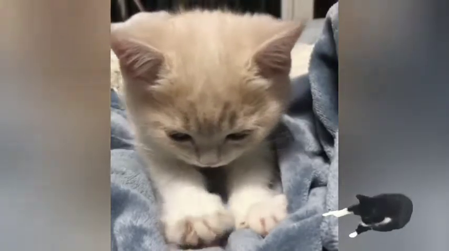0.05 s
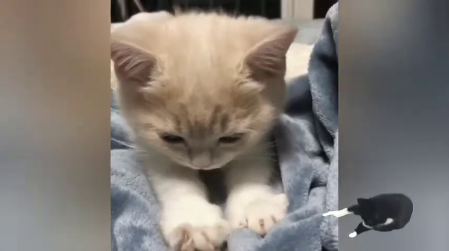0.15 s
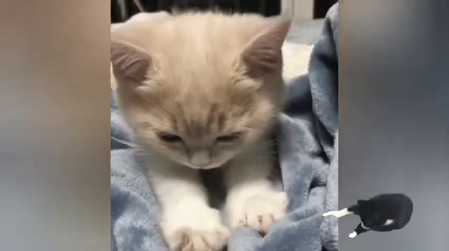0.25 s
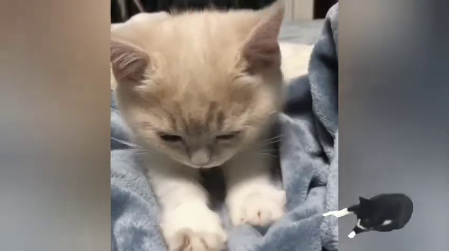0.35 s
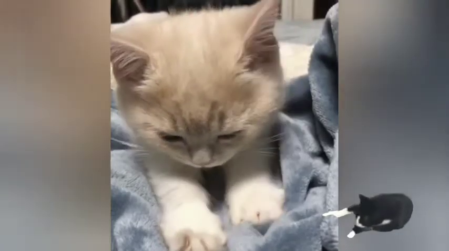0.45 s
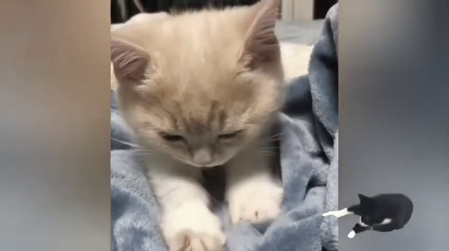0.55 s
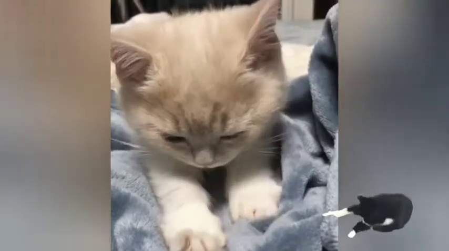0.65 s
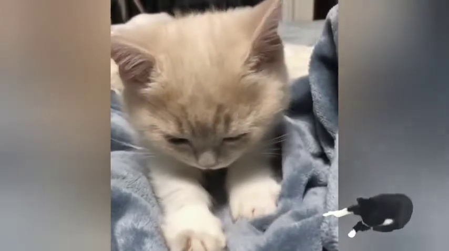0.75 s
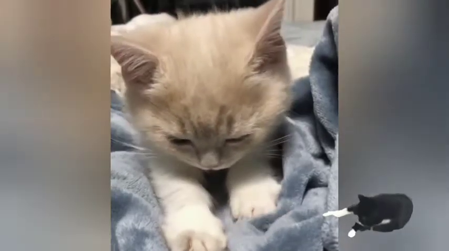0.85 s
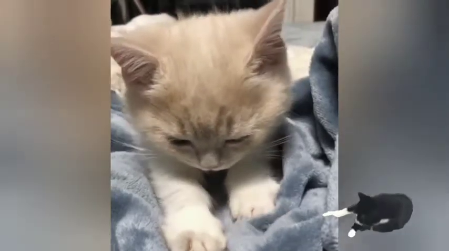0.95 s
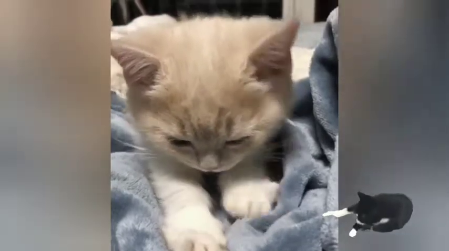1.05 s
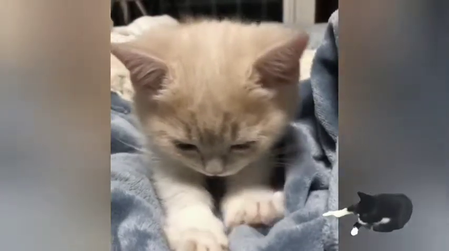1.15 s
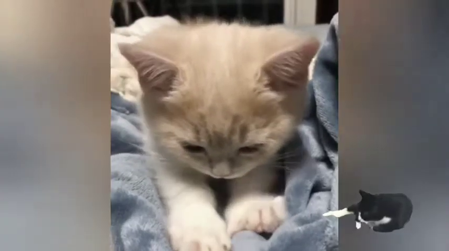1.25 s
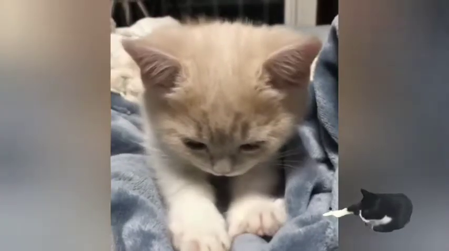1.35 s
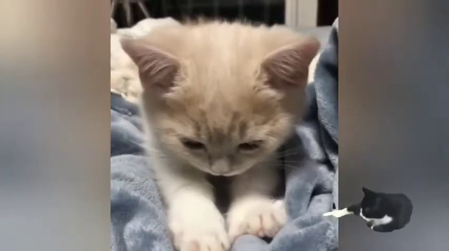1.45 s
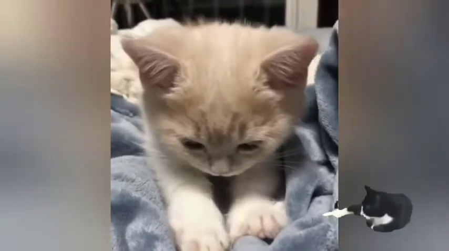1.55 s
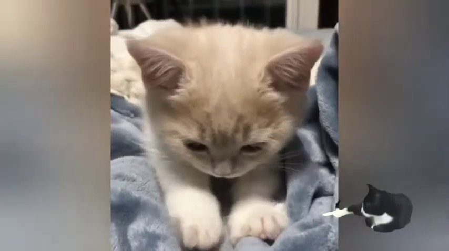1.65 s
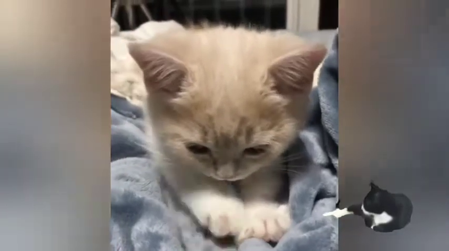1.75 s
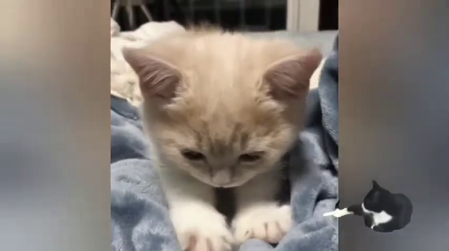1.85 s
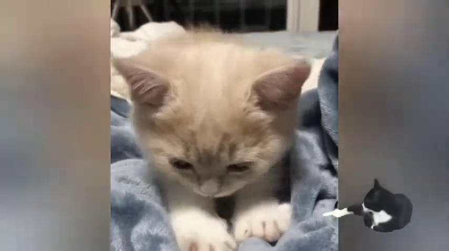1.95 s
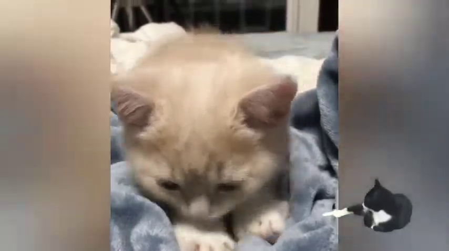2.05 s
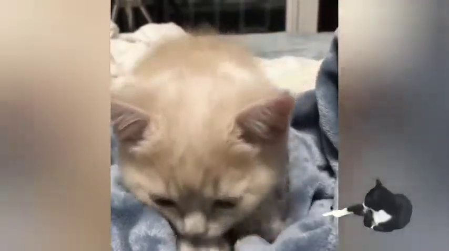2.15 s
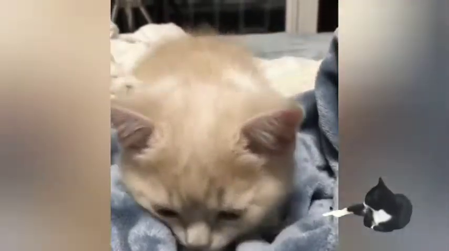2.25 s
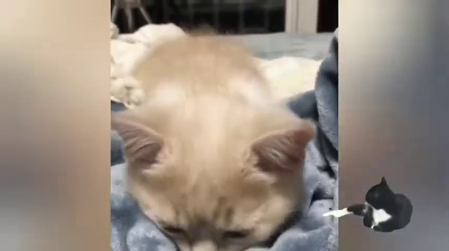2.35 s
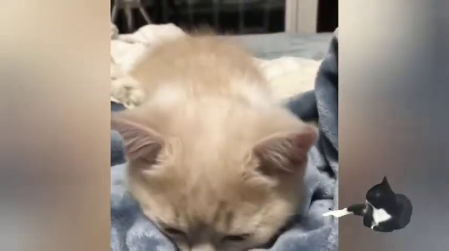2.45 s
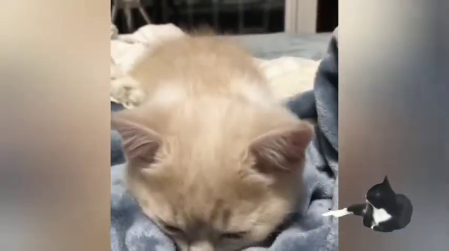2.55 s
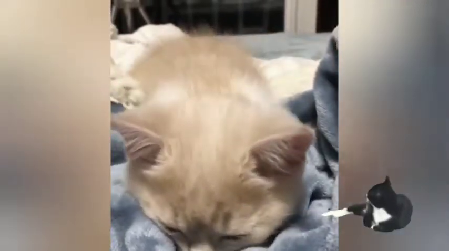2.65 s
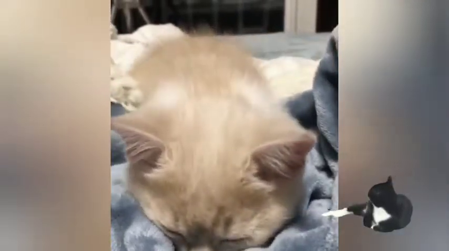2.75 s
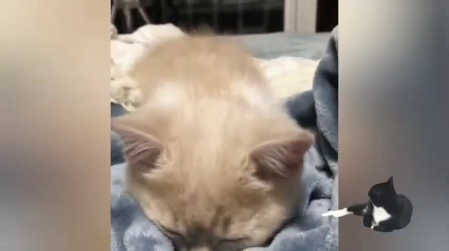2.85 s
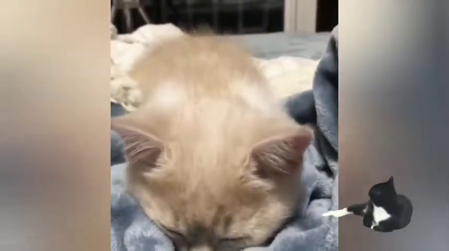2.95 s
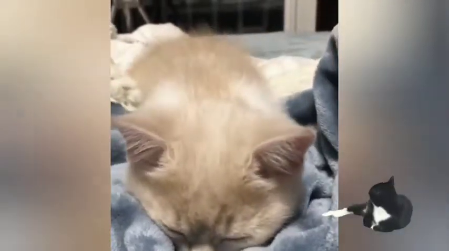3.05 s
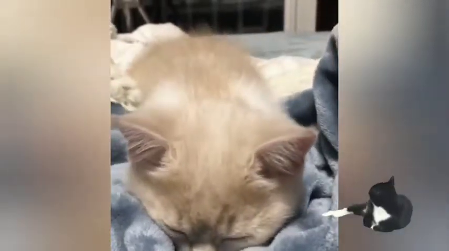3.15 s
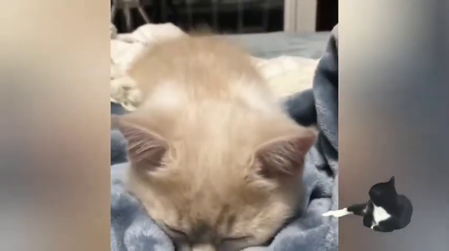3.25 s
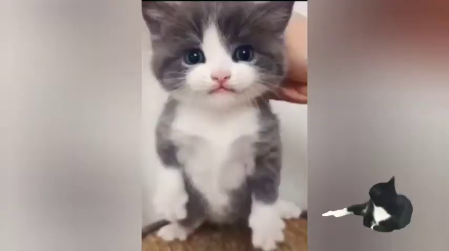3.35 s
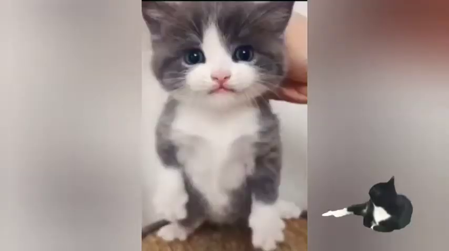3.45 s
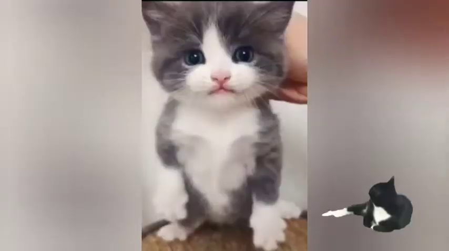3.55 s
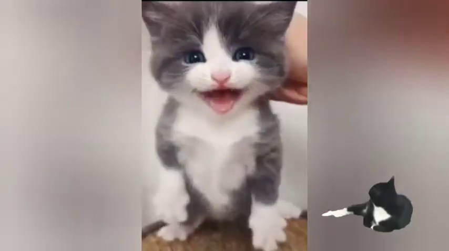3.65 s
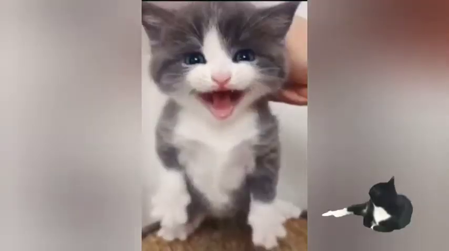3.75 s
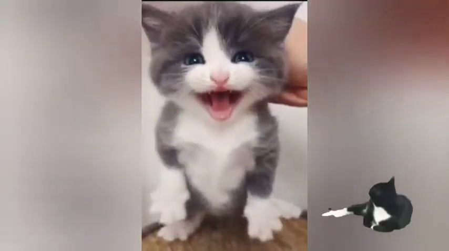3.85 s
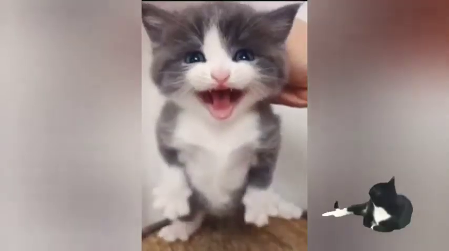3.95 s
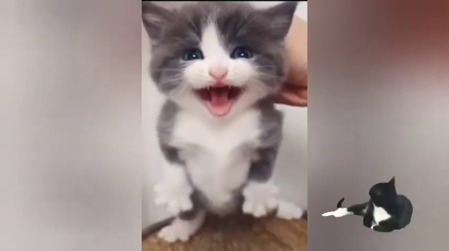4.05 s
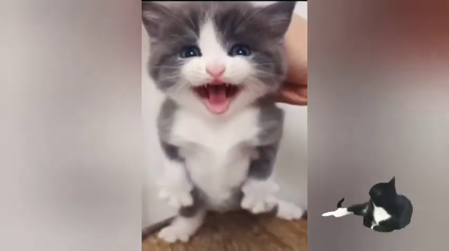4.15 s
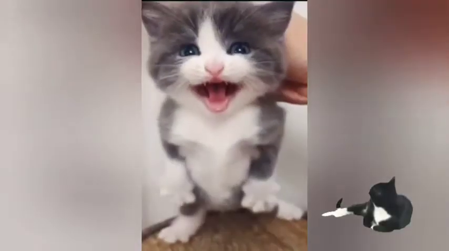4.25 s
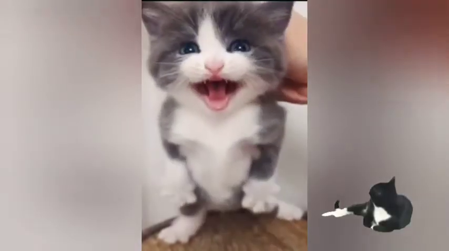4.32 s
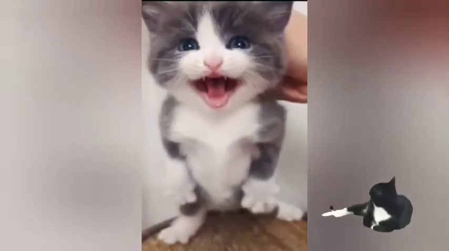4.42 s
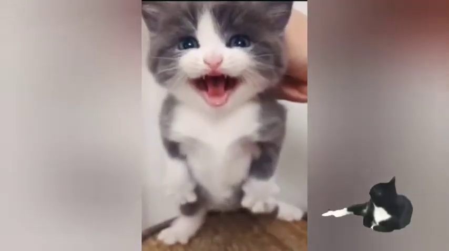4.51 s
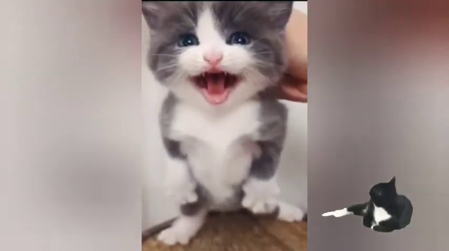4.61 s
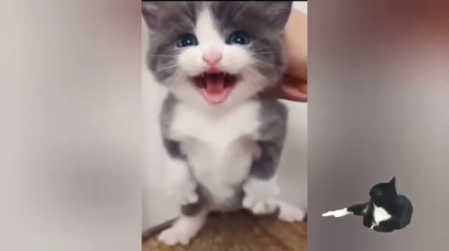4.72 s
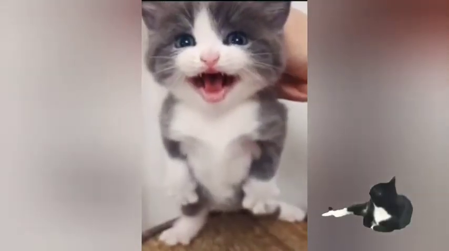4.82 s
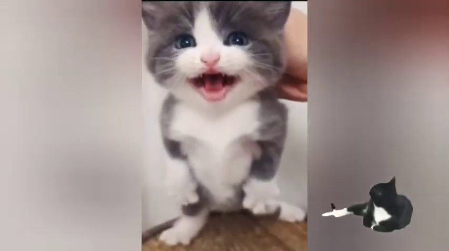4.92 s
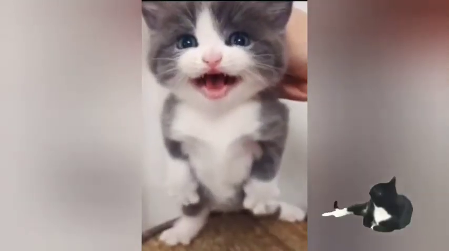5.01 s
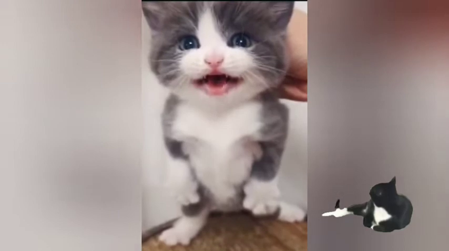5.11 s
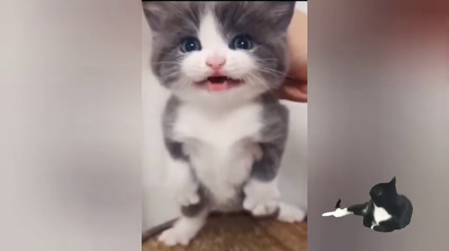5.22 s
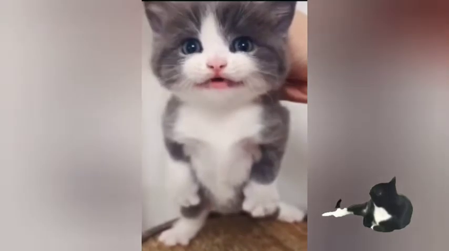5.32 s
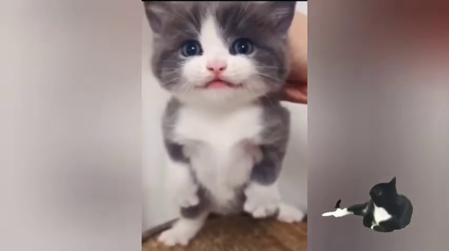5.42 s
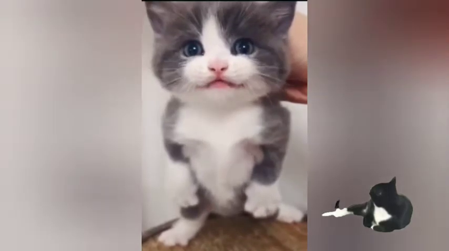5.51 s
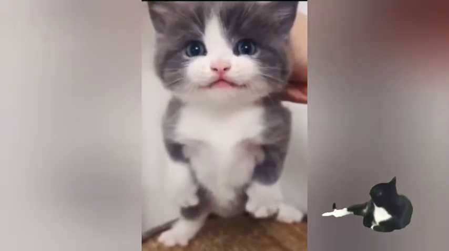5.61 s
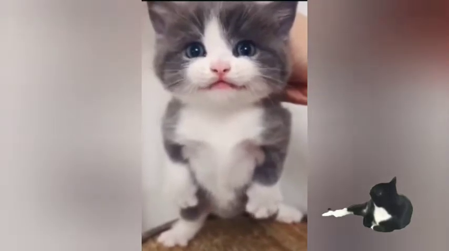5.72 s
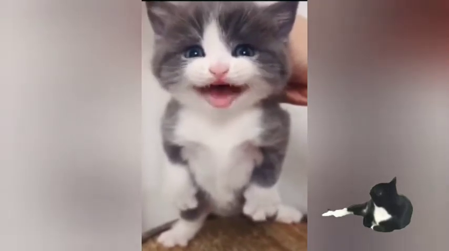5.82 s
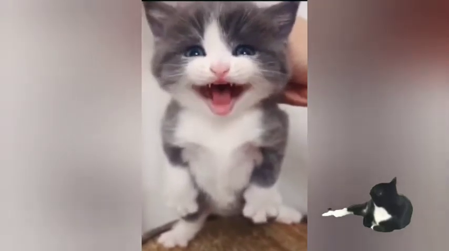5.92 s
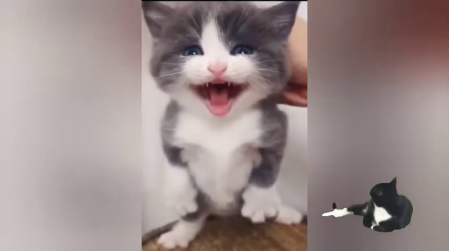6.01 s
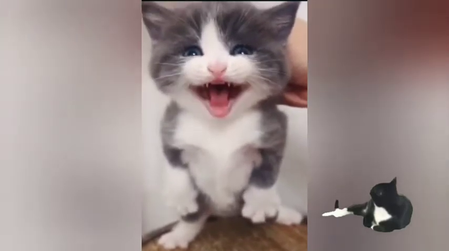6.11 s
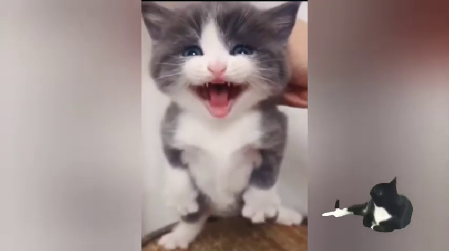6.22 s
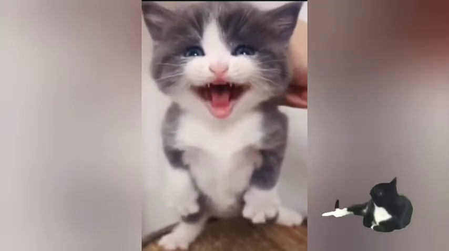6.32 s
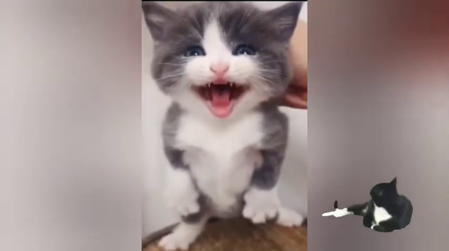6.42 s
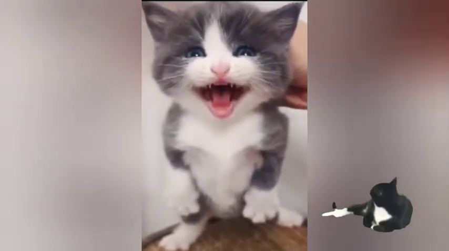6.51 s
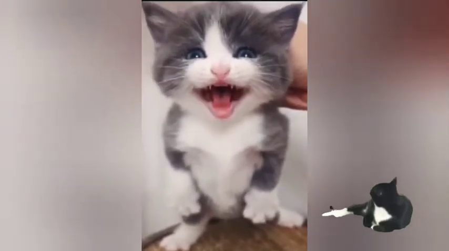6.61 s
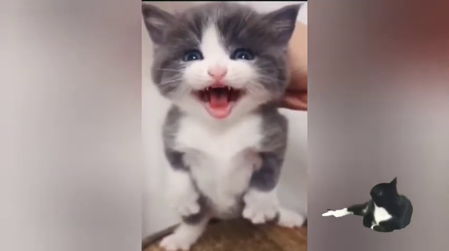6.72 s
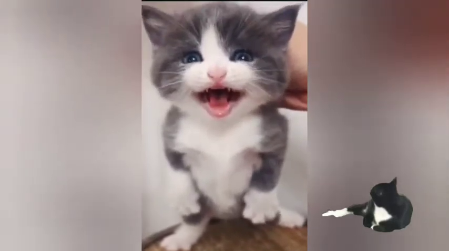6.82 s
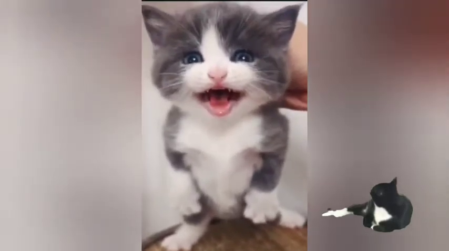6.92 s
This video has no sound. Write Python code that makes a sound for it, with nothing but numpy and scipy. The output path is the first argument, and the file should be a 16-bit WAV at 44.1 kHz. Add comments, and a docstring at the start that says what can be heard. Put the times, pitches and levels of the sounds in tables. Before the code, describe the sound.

From the start, a kitten purrs loudly and steadily, very close to the microphone. The purr is a low, fluttering rumble with a little breath hiss, easing briefly as each breath turns. Between about 0.2 and 2.1 seconds its paws bump the microphone softly several times, with light claw ticks on a blanket and a few tiny squeaks around 2 seconds. At 3.1 seconds the purr cuts to a brief silence. At 3.3 seconds quiet room noise begins with a faint, trilled murmur like a cat further off. A second kitten gives a long, loud, high meow from 3.4 to 5 seconds, starting raspy, rising quickly, then sliding down. Another faint murmur comes at about 5.3 seconds. A second long, falling meow runs from 5.6 seconds to the end, near 7 seconds. Both meows carry the slight echo of a small room.

```python
"""A kitten purrs on a blanket pressed against a phone, while its paws bump and its claws tick.
The purr is its throat snapping twice a cycle, both as it breathes out and as it breathes in.
After a cut to silence, a second kitten in a small room gives two long falling meows:
its vocal folds make the tone and its mouth lifts some of the overtones.
A low murmur, like a grown cat further off, comes just before each meow."""
import sys
import numpy as np
from scipy import signal
from scipy.fft import rfft, irfft
from scipy.io import wavfile
from scipy.ndimage import uniform_filter1d

SR = 44100
rng = np.random.default_rng(int(sys.argv[2]) if len(sys.argv) > 2 else 0)


def transcribe(u):
    """Save the signal u as a 16-bit wav file named by the first command-line argument.

    u: samples, shape (n,) or (channels, n), limited to [-1, 1]; the rate is SR.
    q: integer samples, one column per channel.
    """
    v = np.clip(np.atleast_2d(u).T, -1, 1)
    q = np.round(v * 32767).astype(np.int16)
    wavfile.write(sys.argv[1], SR, q)


N = 307377
T = np.arange(N) / SR

# Steady purring in each breath. Each row: first and last sharp snap in seconds, number of cycles,
# how many ms longer each cycle is than the one before.
PURR_RUNS = [(.017, .770, 23, .035), (.916, 1.632, 20, -.08), (1.699, 2.178, 15, 0),
             (2.219, 2.620, 11, -.3), (2.650, 3.100, 14, 0)]
# Breaths, out and in by turns. Each row: start in seconds, sharp snap dB at start and end, soft snap
# dB at start and end, windpipe ring in dB against the snap, sharp and soft width in ms,
# windpipe pitch in Hz, its ring time in seconds, hiss in dB.
BREATHS = [(0, -2.5, -2.5, -4.5, -8.5, -10, 0.41, 0.73, 294, 0.063, -35),
           (0.887, -2.5, -8, -7.5, -3.5, -9, 0.36, 0.62, 292, 0.053, -38.5),
           (1.658, -4, -6, -3, -11.5, -11.5, 0.43, 0.77, 270, 0.083, -36),
           (2.184, -1, -7, -11.5, -4, -4.5, 0.31, .64, 299, 0.039, -39),
           (2.645, -13.5, -15.5, -7.5, -10.5, 1.5, 0.49, 0.66, 255, 0.058, -38)]
# How far the soft snap trails the sharp one, in cycles: breathing out, then in.
SOFT_SNAP_DELAY = [.505, .545]
# Tone of the body's rumble and of the breath's hiss. Each row: frequency in Hz, relative level in dB.
RUMBLE_TONE = [(15, -41.5), (25, -32.5), (102, 13), (154, -5), (294, -14), (364, 0), (415, -7), (705, -6.5),
               (904, -22.5), (1160, -54), (1300, -35), (1690, -61), (2860, -120)]
HISS_TONE = [(530, -32.5), (900, -1), (1180, -18.5), (1970, -16.5), (3020, -21.5), (3950, -20.5),
             (6190, -25.5), (6700, -28.5), (12000, -33), (13100, -34)]
# Paws bump the phone. Each row: start in seconds, level in dB, pitch in Hz, ring time in seconds.
PAW_BUMPS = [(0.162, -3.5, 130, 0.1), (0.785, -2.5, 148, 0.043), (0.891, 4, 115, .06),
             (1.023, -4, 90, 0.061), (1.186, 9, 121, 0.039), (1.56, 4, 113, 0.047), (2.03, -1, 140, 0.039),
             (2.107, 10.5, 154, 0.032)]
# Squeaks in the purr and around the meows. Each row: start and length in seconds,
# first and last pitch in Hz, level in dB.
SQUEAKS = [(0.645, 0.011, 630, 555, -13), (1.907, 0.024, 962.3, 870, -11), (1.939, 0.015, 804, 752, -6.5),
           (1.967, 0.013, 680, 640, -13), (2.033, 0.0085, 776, 735, -9.5), (2.131, 0.011, 795, 754, -18.5),
           (5.028, 0.014, 516, 416, -37.5), (5.705, 0.0099, 330, 280, -33.5)]
# Claws on cloth or wood. Each row: start in seconds, peak in dB, top frequency in Hz, fade in ms.
CLAW_TICKS = [(.8364, -10, 3600, 1.2), (.8422, -6, 2600, .9), (.8574, -28, 5000, 1.5),
              (.8906, -12, 3500, 1.0), (.9004, -26, 5000, 1.0), (1.1855, -18, 2000, 1.5),
              (1.5565, -14, 2000, 3), (2.1086, -14, 2200, 2.5), (5.1794, -50, 5000, 2.5),
              (5.2544, -50, 8000, 2.5), (5.2894, -48, 5000, 1.5), (5.3547, -50, 8000, 1.5),
              (5.5744, -48, 9000, .8)]
# One list per murmur. Each row: time in seconds, second harmonic in Hz, level in dB, trill from 0 to 1.
MURMURS = [
    [(3.333, 961, -32, 0.34), (3.345, 954, -40.5, 0.09), (3.443, 936, -58, 0.24), (3.475, 860, -45, 0.3),
     (3.5, 900, -38, 0.1)],
    [(5.3, 1002, -48, 0.86), (5.332, 1021, -45, 0.28), (5.44, 972, -42.5, 0.47), (5.594, 995, -44, 0.64),
     (5.676, 832, -50, 0.6), (5.684, 977, -49, 0.7), (5.72, 940, -50, 0.8)],
]
# Each row: relative levels in dB of one murmur's harmonics 1 to 7.
MURMUR_HARMONICS = [
    [-11, 0.0012, -3, 1.5, -10.5, -12, -16.5],
    [-3.5, 0.0039, -18, -21, -32, -33, -41],
]
# Tone of the room's background noise. Each row: frequency in Hz, relative level in dB.
ROOM_TONE = [(15, -43.5), (25, -12), (97, -3), (173, -17), (269, -11), (387, -16), (430, -14.5),
             (477, -20.5), (1760, -31.5), (2410, -30), (3130, -33), (5850, -40.5), (12800, -52),
             (16600, -89), (22000, -120)]
# One list per meow. Each row: time in seconds, pitch in Hz, base level in dB,
# mouth resonance in Hz, its relative strength in dB.
MEOWS = [
    [(3.418, 904, -50, 2960, 23), (3.465, 1363, -42, 3400, 15.5), (3.5, 1654, -36.5, 3420, 8.5),
     (3.53, 1735, -35, 3420, 16), (3.586, 1807, -34.5, 3420, 18), (3.68, 1821, -33.5, 3490, 26.5),
     (3.82, 1787, -29.5, 3550, 24.5), (3.934, 1730, -30, 3610, 23), (4.07, 1626, -32.5, 3300, 17),
     (4.15, 1591, -33, 3470, 14.5), (4.36, 1443, -37, 3330, 8), (4.42, 1358, -39.5, 3260, 16),
     (4.447, 1353, -39, 3240, 7), (4.555, 1208, -42, 3280, 7.5), (4.69, 1165, -44.5, 3420, 10.5),
     (4.9, 965, -47.5, 2900, 10), (4.995, 845, -54.5, 2500, 26.5), (5.022, 752, -53, 2350, 23.5)],
    [(5.62, 1075, -47.5, 3800, 17), (5.645, 1350, -41.5, 4000, 16.5), (5.684, 1470, -40, 4340, 18.5),
     (5.69, 1650, -31, 4320, -8), (5.703, 1710, -31, 4310, -10), (5.72, 1626, -32, 4260, -10),
     (5.77, 1676, -29.5, 4150, -3), (5.816, 1857, -31.5, 4000, 5.5), (5.9, 1824, -29.5, 3860, 0),
     (6.04, 1857, -32, 3750, 8.5), (6.12, 1828, -31, 3680, 4), (6.2, 1748, -32.5, 3610, 7),
     (6.32, 1658, -32.5, 3500, 3), (6.4, 1544, -35, 3500, 5), (6.46, 1448, -38, 3380, 7),
     (6.6, 1272, -39.5, 3530, 0), (6.7, 1186, -41.5, 3700, 6.5), (6.85, 1127, -44.5, 3600, 12),
     (6.955, 1040, -46, 3530, 17.5)],
]
# Each row: one meow's lowest harmonic in dB above the base, low and high Hz of its strongest breath.
MEOW_VOICES = [(4.7, 2800, 5200), (1.2, 3750, 5100)]
# Tone of the meows' overtones. Each row: frequency in Hz, relative level in dB.
OVERTONES = [(1700, -8.5), (2700, -1.5), (3600, -6.5), (5000, 2), (7000, -1), (9000, -1), (11000, -4),
             (13200, -13)]
# The voice breaks. Each row: start and length in seconds, noise in dB, shake as a share of the pitch.
RASPS = [(3.416, .1, -41, .045), (4.41, .06, -58, .006), (5.02, .005, -36, .02), (5.028, .03, -43, .0),
         (5.618, .075, -38, .018), (5.685, .045, -35, .03)]
# The voice catches. Each row: start and length in seconds, change of level in dB.
CATCHES = [(3.454, .05, 0.5), (6.44, 0.026, -2.5), (6.587, 0.033, -2), (6.865, .03, -3)]
# Extra air leaks past the vocal folds. Each row: start and length in seconds, level in dB.
AIR_LEAKS = [(4.17, 0.86, -55), (4.42, .12, -55), (5.797, 0.55, -47), (6.306, 0.39, -59)]

DROP_S, BACK_S, STOP_S = 3.093, 3.101, 3.121  # the purr drops out, comes back, then stops
SECOND_SCENE_S = 3.333
TURN_HZ, TURN_S = 28, 0.042  # purr rate between breaths; reach of each turn of the airflow
TURN_SHARP_DB, TURN_SOFT_DB, TURN_RING_DB, TURN_HISS_DB = -11.5, -6, 3, -2.5  # changes at a turn


def undb(db):
    """Turn decibels into a gain."""
    return 10 ** (np.asarray(db) / 20)


def level(x, db):
    """Scale a sound to an average (rms) level."""
    return x * undb(db) / np.sqrt(np.mean(x ** 2))


def tone_db(hz, table):
    """Read a tone table at any frequency, on a log axis."""
    freqs, db = np.transpose(table)
    return np.interp(np.log(np.maximum(hz, 1)), np.log(freqs), db)


def noise(table):
    """Noise shaped by a tone table, at rms 1."""
    spectrum = rfft(rng.standard_normal(N))
    hz = np.arange(len(spectrum)) * SR / N
    return level(irfft(spectrum * undb(tone_db(hz, table)), N), 0)


def band(x, lo_hz, hi_hz, order=2):
    """Keep what lies between two frequencies."""
    return signal.sosfilt(signal.butter(order, [lo_hz, hi_hz], "band", fs=SR, output="sos"), x)


def walk(rate):
    """A smooth random wander of about 1, with `rate` new values a second."""
    hold = int(SR / rate)
    steps = np.repeat(rng.standard_normal(N // hold + 1), hold)
    return 1.3 * uniform_filter1d(uniform_filter1d(steps, hold), hold)[:N]


def add(out, start_s, x):
    """Mix a short sound in."""
    i = int(start_s * SR)
    out[i:i + len(x)] += x[:len(out) - i]


def span(start_s, end_s, ramp_s):
    """1 between two times, ramping from and to 0."""
    return np.clip(np.minimum(T - start_s, end_s - T) / ramp_s, 0, 1)


def ring(t, hz, db, ring_s):
    """A tone that fades by 60 dB in its ring time."""
    return undb(db) * np.sin(2 * np.pi * hz * t) * np.exp(-np.log(1000) * np.abs(t) / ring_s)


def throat_cycles():
    """Count the purr's cycles over time; sharp snaps fall at 0.5, 1.5 and so on."""
    snaps = [PURR_RUNS[0][0] - 1 / TURN_HZ]
    for first, last, count, slow_ms in PURR_RUNS:
        turn_cycles = round((first - snaps[-1]) * TURN_HZ)
        snaps += list(np.linspace(snaps[-1], first, turn_cycles + 1)[1:-1])
        k = np.arange(count + 1)
        snaps += list(first + (last - first) * k / count + slow_ms / 2000 * k * (k - count))
    snaps += [snaps[-1] + 1 / TURN_HZ]
    return np.interp(T, snaps, np.arange(len(snaps)) - .5) + .001


def breathing():
    """Which breath it is, how far through it, and how near a turn of the airflow (0 to 1)."""
    starts = np.append(np.transpose(BREATHS)[0], STOP_S)
    place = np.minimum(np.interp(T, starts, np.arange(len(starts))), len(BREATHS) - 1e-6)
    turn = sum(np.exp(-((T - s) / TURN_S) ** 2) for s in starts[1:-1])
    return place.astype(int), place % 1, turn


def snap(width_ms, pipe_hz, pipe_db, ring_s):
    """A push and pull of air rings the windpipe, chest and nose."""
    t = np.arange(2600) / SR - .003
    widths = t * 1000 / width_ms
    pulse = -1.6 * widths * np.exp(-widths ** 2 / 2)
    windpipe = ring(t, pipe_hz, pipe_db, ring_s)
    chest = ring(t, hz=141, db=-22, ring_s=0.038)
    nose = ring(t, hz=763, db=-16, ring_s=0.012)
    return pulse - (t > 0) * (windpipe + chest) - nose


def purr(muffle_hz=1019):
    """The vocal folds close sharply and part softly once a cycle; breathing in flips the pressure."""
    cycles = throat_cycles()
    breath, through, turn = breathing()
    columns = np.transpose(BREATHS)[:, breath]
    _, sharp0, sharp1, soft0, soft1, pipe_db, *width_ms, pipe_hz, ring_s, hiss_db = columns
    sharp_db = sharp0 + (sharp1 - sharp0) * through + TURN_SHARP_DB * turn
    soft_db = soft0 + (soft1 - soft0) * through + TURN_SOFT_DB * turn
    snaps, chance = np.zeros(N), rng.standard_normal((200, 2, 4))
    purring = T < STOP_S
    for k in range(int(cycles[purring][-1])):
        delay = SOFT_SNAP_DELAY[breath[np.searchsorted(cycles, k + 1)] % 2]
        for soft, db in enumerate([sharp_db, soft_db]):
            late, size, wide, tune = chance[k, soft]
            at = np.interp(k + .5 + soft * delay, cycles[purring], T[purring])
            at += (0.00043 + 0.00054 * soft) * late
            i = int(at * SR)
            shape = snap(width_ms[soft][i] * (1 + 0.13 * wide), pipe_hz[i] * (1 + 0.11 * tune),
                         pipe_db[i] + TURN_RING_DB * turn[i] - 3 * soft, ring_s[i])
            add(snaps, at - .003, (-1) ** breath[i] * undb(db[i] + .9 * size) * shape)
    # the chest shudders after every snap and settles before the next
    settle = .3 + np.exp(-(2 * cycles % 1) / .3)
    shudder = settle * undb(-21 + 2 * walk(30.06)) * band(noise(RUMBLE_TONE), 22, 750, order=1)
    # the purr is muffled: almost nothing above about 1 kHz comes through
    muffled = signal.sosfiltfilt(signal.butter(7, muffle_hz, fs=SR, output="sos"), snaps + shudder)
    # air rasps through the throat just after each sharp snap
    puff = np.exp(-((cycles - .5) % 1) / 0.14) * undb(.5 * sharp_db - 35.5 + 3.16 * walk(22))
    hiss_db = uniform_filter1d(hiss_db, SR // 10) + TURN_HISS_DB * turn + walk(24.93)
    hiss = undb(hiss_db) * noise(HISS_TONE)
    return muffled + puff * level(band(rng.standard_normal(N), 1250, 2660), 0) + hiss


def paw_bumps():
    """Soft paws knock the phone: low tones that swell and die quickly."""
    out, t = np.zeros(N), np.arange(6000) / SR
    for start, db, hz, ring_s in PAW_BUMPS:
        add(out, start, ring(t, hz, db, ring_s) * (1 - np.exp(-t / 0.0036)))
    return out


def squeaks():
    """Tiny tones that slide down in pitch."""
    out = np.zeros(N)
    for start, length, first_hz, last_hz, db in SQUEAKS:
        through = np.arange(int(length * SR)) / (length * SR)
        phase = 2 * np.pi * np.cumsum(first_hz + (last_hz - first_hz) * through) / SR
        add(out, start, undb(db) * np.sin(np.pi * through) ** 1.3 * np.sin(phase))
    return out


def claw_ticks():
    """Claws catch and scuff, each a very short burst of noise."""
    out, t = np.zeros(N), np.arange(6000) / SR
    for start, db, top_hz, fade_ms in CLAW_TICKS:
        scrape = band(rng.standard_normal(len(t)) * np.exp(-1000 * t / fade_ms), 350, top_hz)
        add(out, start, undb(db) * scrape / np.max(np.abs(scrape)))
    return out


def murmurs(trill_hz=38):
    """A voice with the mouth closed, trilled by the throat."""
    out = np.zeros(N)
    trill = np.sin(2 * np.pi * np.cumsum(trill_hz + 8 * walk(13)) / SR)
    for call, harmonics in zip(MURMURS, MURMUR_HARMONICS):
        times, *columns = np.transpose(call)
        second_hz, db, depth = (np.interp(T, times, c) for c in columns)
        pitch_hz = second_hz / 2 * (1 + 0.066 * depth * walk(400))
        phase = 2 * np.pi * np.cumsum(pitch_hz) / SR
        voice = sum(undb(harmonic_db + 5.4 * depth * walk(60)) * np.sin(k * phase)
                    for k, harmonic_db in enumerate(harmonics, 1))
        fade = span(times[0] - .01, times[-1] + 0.011, 0.054)
        out += np.sqrt(2) * undb(db) * (1 + depth * trill) * voice * fade
    return out


def meows(mouth_width_hz=420, breath_db=-32):
    """The vocal folds make harmonics, the mouth lifts those near its resonance, and air hisses past."""
    out, air = np.zeros(N), rng.standard_normal(N)
    shake = sum(share * span(s, s + length, .4 * length) for s, length, _, share in RASPS)
    wobble = .002 * walk(60) + 0.0035 * walk(14) + 0.0011 * walk(35) + (0.00094 + shake) * walk(900)
    catch_db = sum(db * span(s, s + length, .5 * length) for s, length, db in CATCHES)
    leak = sum(undb(db) * span(s, s + length, 0.14 * length) for s, length, db in AIR_LEAKS)
    for call, (lowest_db, lo_hz, hi_hz) in zip(MEOWS, MEOW_VOICES):
        times, *columns = np.transpose(call)
        hold = 700 * (times[-1] > 6.9)  # the last meow carries on to the end
        on = slice(int(times[0] * SR) - 100, int(times[-1] * SR) + hold)
        hz, db, mouth_hz, boost_db = (np.interp(T[on], times, c) for c in columns)
        phase = 2 * np.pi * np.cumsum(hz * (1 + wobble[on])) / SR
        # the lowest harmonic thins by 1 dB for each octave the pitch sinks
        voice = undb(lowest_db + np.log2(hz / 1700) + walk(25)[on]) * np.sin(phase)
        waver = undb(1.1 * walk(30)[on])
        for k in range(2, 18):
            mouth = undb(boost_db) / (1 + ((k * hz - mouth_hz) / mouth_width_hz) ** 2) ** 0.93
            overtone = undb(tone_db(k * hz, OVERTONES) + 3.2 * walk(18)[on])
            gain = np.hypot(overtone, mouth * waver) * (k * hz < 14000)
            voice += gain * np.sin(k * phase + 2 * np.pi * rng.random())
        hiss = level(band(air, lo_hz, hi_hz, order=3), 0) + level(band(air, hi_hz, 12000), -2.5)
        breath = (undb(db + breath_db) + leak[on]) * undb(2 * walk(40)[on]) * hiss[on]
        fade_in = np.minimum(1, np.arange(len(voice)) / 100)
        out[on] += (np.sqrt(2) * undb(db + catch_db[on]) * voice + breath) * fade_in
    return out


def rasps():
    """Rough, fluttering noise where the meowing voice breaks."""
    rough = level(band(rng.standard_normal(N), 2200, 9000, order=1), 0) * undb(4 * walk(150))
    return rough * sum(undb(db) * span(s, s + length, .3 * length) for s, length, db, _ in RASPS)


def small_room(x, ring_s=0.41, echo_db=-18.5):
    """Nearby walls add a dense echo that dies away."""
    t = np.arange(int(.6 * SR)) / SR
    tail = rng.standard_normal(len(t)) * np.exp(-np.log(1000) * t / ring_s) * (t > .004)
    tail = band(tail, 200, 5600, order=1)
    return x + undb(echo_db) * signal.fftconvolve(x, tail / np.sqrt(np.sum(tail ** 2)))[:N]


def room_noise(voices, max_dip_db=-2, half_dip_at_db=-43):
    """Background noise, which the phone turns down as the voices get louder."""
    loudness = uniform_filter1d(np.abs(voices), 4000)
    dip_db = max_dip_db * loudness / (loudness + undb(half_dip_at_db))
    return undb(-47.5 + dip_db + walk(6)) * noise(ROOM_TONE)


def scene():
    """The blanket, a moment of silence, then the room; both channels are the same."""
    blanket = purr() * (span(-1, DROP_S, .002) + span(BACK_S, STOP_S, 0.0024))
    # a faint hiss runs under the purr's last moment
    blanket += undb(-46.5) * noise(HISS_TONE) * span(DROP_S - .01, STOP_S + 0.016, 0.014)
    voices = small_room(meows() + rasps() + murmurs())
    room = (voices + room_noise(voices)) * span(SECOND_SCENE_S, 9, 0.0017)
    return np.tile(blanket + room + paw_bumps() + squeaks() + claw_ticks(), (2, 1))


def record(dry, top_hz=13250):
    """The phone rounds off the loudest peaks and cuts the highest treble."""
    rounded = .98 * np.tanh(dry / .98)
    return signal.sosfilt(signal.ellip(10, .2, 60, top_hz, fs=SR, output="sos"), rounded)


dry = scene()
out = record(dry)
transcribe(out)
```